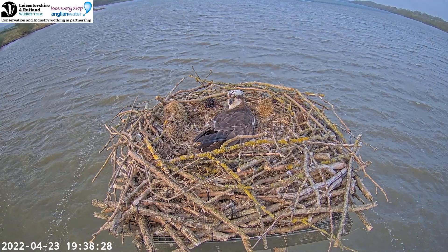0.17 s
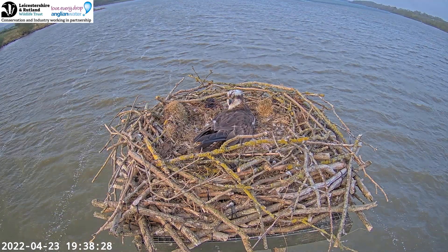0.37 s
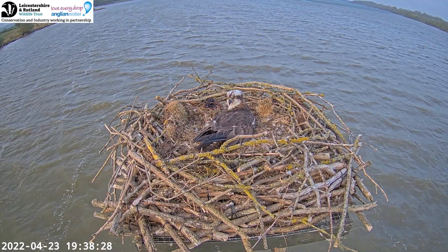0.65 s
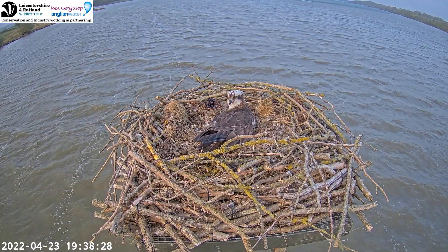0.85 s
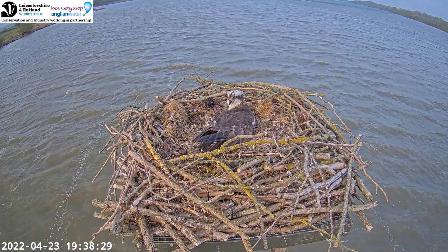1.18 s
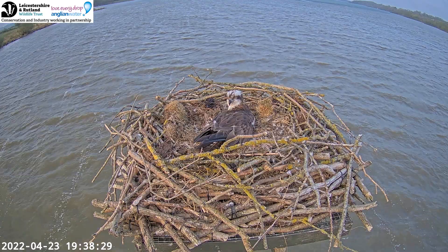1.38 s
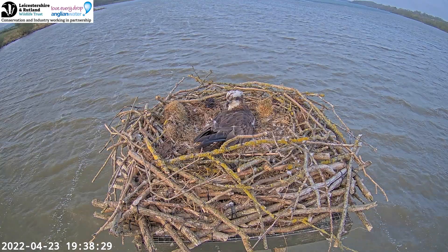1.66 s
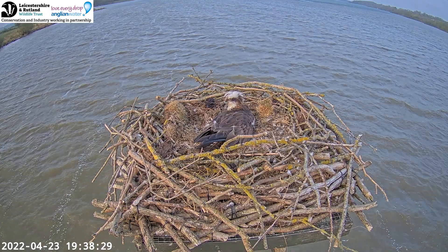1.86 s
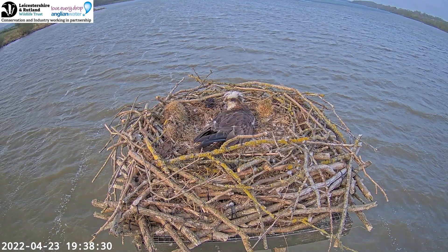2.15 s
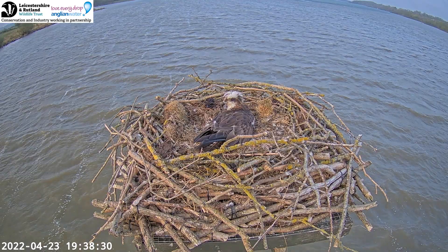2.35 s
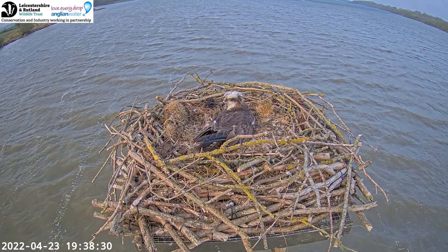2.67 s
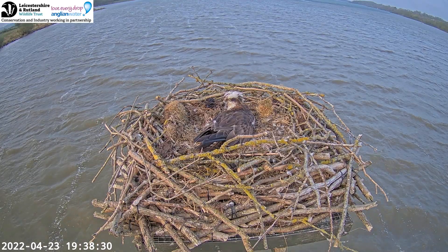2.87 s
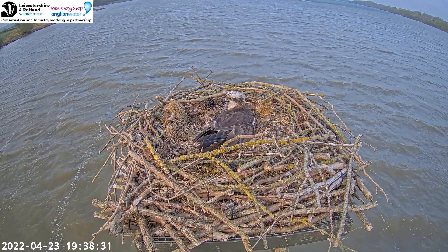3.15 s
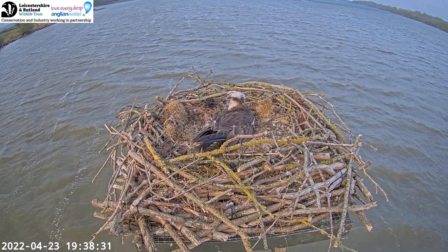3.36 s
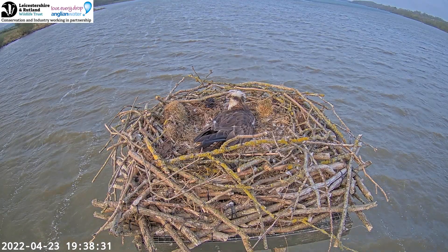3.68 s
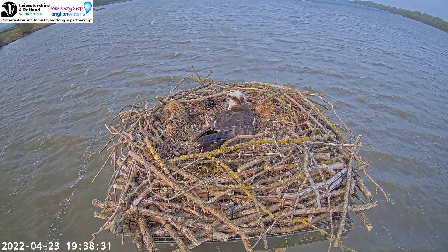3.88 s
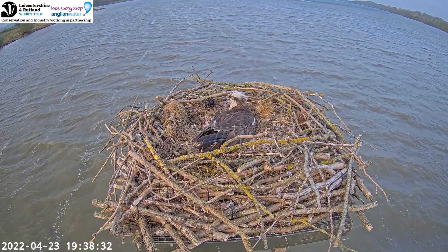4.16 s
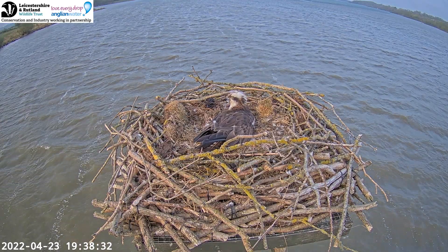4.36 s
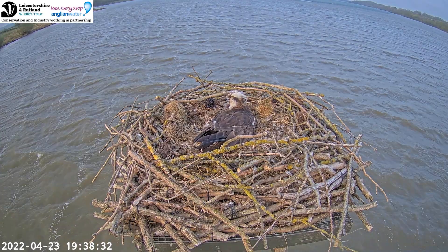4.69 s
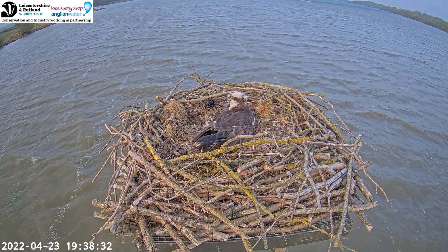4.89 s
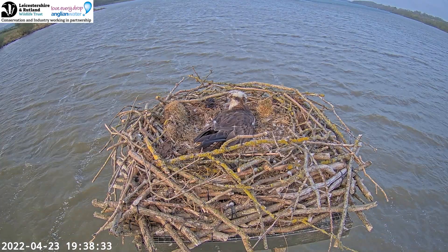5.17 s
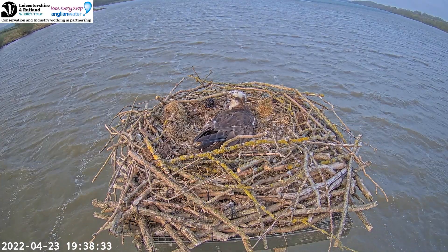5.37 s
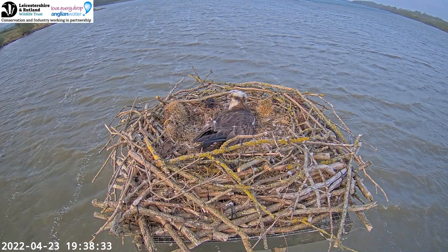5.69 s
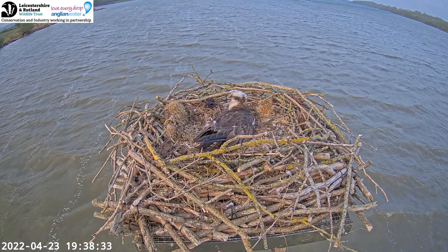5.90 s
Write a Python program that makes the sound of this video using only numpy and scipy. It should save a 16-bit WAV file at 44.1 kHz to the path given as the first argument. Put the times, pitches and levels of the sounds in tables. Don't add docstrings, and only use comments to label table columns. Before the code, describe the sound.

Close outdoor sound from an exposed microphone: deep gusty rumble, soft buffeting and a thin wash of waves. A bird of prey utters two sharp, raspy whistles at the start, pauses, then begins a regular series of brief high chirps, clearer at first and then rougher and strong, continuing until the end. A few faint twig clicks occur, mostly in the gap.

```python
import sys
import numpy as np
from scipy import signal
from scipy.fft import rfft, irfft
from scipy.io import wavfile
from scipy.ndimage import uniform_filter1d

SR = 44100
rng = np.random.default_rng(int(sys.argv[2]) if len(sys.argv) > 2 else 0)


def boost(x):
    u = np.asarray(x, float) / 20
    return 10 ** u


def bounce(signal):
    frames = np.transpose(np.atleast_2d(signal))
    limited = np.clip(frames, -1, 1)
    pcm = np.round(limited * 32767).astype(np.int16)
    wavfile.write(sys.argv[1], SR, pcm)


N = 266364


def at_hz(points, hz):
    point_hz, value = np.array(points).T
    return np.interp(np.log(hz), np.log(point_hz), value)


def in_time(rows):
    return np.interp(np.arange(N) / SR, *np.transpose(rows))


def rms_one(x):
    return x / np.sqrt(np.mean(x ** 2) + 1e-20)


def drift(rate_hz, size):
    r = np.exp(-2 * np.pi * rate_hz / SR)
    settle = 20000
    noise = rng.standard_normal(size + settle)
    return rms_one(signal.lfilter([1], [1, -2 * r, r * r], noise)[settle:])


def add(out, start_s, sound):
    i = round(start_s * SR)
    part = sound[max(-i, 0):N - i]
    out[max(i, 0):max(i, 0) + len(part)] += part


def fade_ends(size, attack_s, release_s):
    t = np.arange(size) / SR
    nearest_end = np.minimum(t / attack_s, t[::-1] / release_s)
    return np.sin(np.pi / 2 * np.clip(nearest_end, 0, 1)) ** 2


def ramp(x, start, end):
    return np.sin(np.pi / 2 * np.clip((x - start) / (end - start), 0, 1)) ** 2


def phase_of(hz):
    return 2 * np.pi * np.cumsum(hz) / SR


# time_s, level_db
GUSTS = [(0.0, -31), (0.34, -32), (0.37, -21.5), (0.45, -31.5), (1.18, -25), (1.28, -15.5), (1.5, -43),
         (1.58, -22), (1.73, -32), (1.95, -17.5), (2.02, -29), (3.85, -26), (4.19, -22), (4.37, -26.5),
         (4.81, -18.5), (4.88, -25.5), (5.74, -28), (6.04, -20)]
# time_s, level_db
BREEZE = [(0.05, -51), (0.25, -50), (0.69, -51.5), (4.71, -47.5), (4.79, -44.5), (6.0, -43.5)]
# pitch_hz, level_db (per Hz)
AIR_COLOUR = [(2.4, -51), (4.0, -11.5), (16, 5.5), (25, -5.5), (64, -16), (75, -21.5), (100, -24),
              (173, -33), (496, -43), (826, -43.5), (1170, -48.5), (1560, -49), (2610, -66), (5260, -77),
              (8220, -79.5), (10700, -122), (18100, -120)]
# pitch_hz, width_hz, boost_db
HOUSING = [(1574, 59, 3.5), (2307, 420, 4.5), (3230, 600, 6), (3830, 170, 4), (5250, 230, 9),
           (5400, 200, -2), (7980, 870, -13.5)]
RUMBLE_DB, RUMBLE_FOLLOWS, RUMBLE_LUMPS_DB = -28.5, 1.05, 3
BUFFET_DB, BUFFET_FOLLOWS, BUFFET_LUMPS_DB = -35.5, 0.39, 1.5
BUFFET_FRESHENS = 0.65
WASH_FOLLOWS = 0.19
EDDY_BUFFET_DB, EDDY_WASH_DB, EDDY_S = 4.5, 3, 0.015


def wind(rumble_share):
    t = np.arange(N) / SR
    gust_db = in_time(GUSTS)
    gust_db = gust_db - gust_db.mean()
    breeze_db = in_time(BREEZE)
    eddies = sum(abs(height) * np.exp(-((t - s) / EDDY_S) ** 2) for s, height, _ in EDDIES)

    hz = np.maximum(np.fft.rfftfreq(N, 1 / SR), 1)
    colour_db = at_hz(AIR_COLOUR, hz)
    for peak_hz, width_hz, boost_db in HOUSING:
        colour_db = colour_db + boost_db / (1 + (2 * (hz - peak_hz) / width_hz) ** 2)
    coloured = rfft(rng.standard_normal(N)) * boost(colour_db)

    groups = np.zeros((3, N))
    together = drift(3.7, N)
    for centre_hz in 3 * 2 ** np.arange(0, 12.5, .5):
        window = np.cos(np.pi * np.clip(np.log2(hz / centre_hz), -.5, .5)) ** 2
        flicker = boost(1.23 * together + 0.62 * drift(20.5, N))
        group = int(centre_hz > 40) + int(centre_hz > 200)
        groups[group] += flicker * irfft(coloured * window, N)

    power = uniform_filter1d(groups[:2] ** 2, size=5000, axis=1)
    groups[:2] /= np.sqrt(power + 1.4 * groups[:2].var(axis=1, keepdims=True))
    groups[0] *= rumble_share

    rumble_db = RUMBLE_DB + RUMBLE_FOLLOWS * gust_db + RUMBLE_LUMPS_DB * drift(10, N)
    buffet_db = BUFFET_DB + BUFFET_FOLLOWS * gust_db + BUFFET_LUMPS_DB * drift(9, N)
    buffet_db += BUFFET_FRESHENS * (breeze_db - breeze_db.mean()) + EDDY_BUFFET_DB * eddies
    wash_db = breeze_db + 1.0 + WASH_FOLLOWS * gust_db + EDDY_WASH_DB * eddies
    return sum(boost(db) * rms_one(g) for g, db in zip(groups, [rumble_db, buffet_db, wash_db]))


# time_s, height (sign is the push direction), width_ms
EDDIES = [(0.367, 0.23, 12), (1.291, 0.59, 21), (1.334, -0.2, 37), (1.949, 0.22, 17), (4.014, 0.42, 23),
          (4.132, -0.29, 16), (4.159, -0.45, 27), (4.185, 0.22, 13), (4.251, 0.25, 26), (4.732, -0.34, 34),
          (4.755, 0.066, 33), (4.786, 0.25, 8.3), (4.803, -0.27, 18), (6.025, -0.17, 10.4)]


def thumps():
    out, rumble_share, t = np.zeros(N), np.ones(N), np.arange(N) / SR
    for s, height, width_ms in EDDIES:
        out += 0.8 * height * np.exp(-np.log(2) * ((t - s) / (width_ms / 2000)) ** 2)
        rumble_share *= 1 - 0.97 * np.exp(-((t - s) / (width_ms / 500)) ** 2)
    return out - uniform_filter1d(out, size=5000), rumble_share


# start_s, level_db, pitch_hz
TICKS = [(0.439, -66, 6700), (0.824, -72.5, 6900), (0.871, -67.5, 6600), (1.961, -70.5, 8100),
         (2.123, -69.5, 6300), (2.868, -68, 7700)]


def twigs():
    out, t = np.zeros(N), np.arange(300) / SR
    for s, db, hz in TICKS:
        add(out, s, boost(db) * np.exp(-t / 0.0055) * np.sin(2 * np.pi * hz * t))
    return out


def glide(row, overtones_db, attack_s, release_s):
    _, length_s, start_hz, end_hz, db = row
    size = round(length_s * SR)
    turn = phase_of(np.linspace(start_hz, end_hz, size))
    tone = sum(boost(level_db) * np.sin((k + 1) * turn) for k, level_db in enumerate(overtones_db))
    return np.sqrt(2) * boost(db) * fade_ends(size, attack_s, release_s) * tone


# start_s, length_s, start_hz, end_hz, level_db
PIPS = [(4.397, .017, 1910, 2040, -42), (5.768, 0.019, 1904, 2016, -41.5)]
PIP_OVERTONES_DB = [7, -2, -21, -42]
# start_s, length_s, start_hz, end_hz, level_db
STRAYS = [(2.925, 0.03, 4200, 4750, -65.5), (2.95, 0.019, 3450, 3830, -67), (2.982, 0.026, 3950, 4100, -58),
          (3.01, .016, 4000, 3820, -62), (2.966, 0.044, 2950, 3200, -56.5), (2.994, 0.041, 5900, 5950, -56),
          (3.015, 0.032, 5350, 4800, -55.5), (3.17, 0.014, 5900, 6440, -62),
          (3.177, 0.027, 3610, 3950, -70)]


def voice_breaks(out):
    for pip in PIPS:
        add(out, pip[0], glide(pip, PIP_OVERTONES_DB, 0.0073, 0.002))
    for stray in STRAYS:
        add(out, stray[0], glide(stray, [0], .006, .006))


CLIMB_SHARE, CLIMB_PER_KHZ, CLIMB_POWER = .3, .55, 2.2
SINK_FROM, SINK_SPAN, SINK_POWER = 0.67, 0.36, 1.45
HOARSE_FROM, HOARSE_FULL, CLEAR_FROM, CLEAR_FULL = 0.024, 0.25, 0.67, .95
MIDDLE_DIP_DB, OPENING_SHARE, OPENING_SPAN = -6, 0.46, 0.2


def arch(share, leap_hz):
    climb = CLIMB_SHARE + CLIMB_PER_KHZ * leap_hz / 1000
    up = 1 - np.maximum(1 - share / climb, 0) ** CLIMB_POWER
    down = (np.maximum(share - SINK_FROM, 0) / SINK_SPAN) ** SINK_POWER
    clear = ramp(share, CLEAR_FROM, CLEAR_FULL)
    opening = OPENING_SHARE * np.maximum(1 - share / OPENING_SPAN, 0)
    full = opening + clear - 0.34 * ramp(share, CLEAR_FULL, 1)
    hoarse = ramp(share, HOARSE_FROM, HOARSE_FULL) * (1 - clear)
    return up, down, MIDDLE_DIP_DB * (1 - full), hoarse


PEAK_SHARE, FADE_FROM, FADE_SPAN = .4, .54, .17
SCOOP_SHARE, DROOP_SHARE = .05, .025
SWELL_DB, OVERTONE_ENTRY_DB, FADE_DB = -28, -5, -27


def rise(later):
    early = np.maximum(1 - later / PEAK_SHARE, 0)
    late = np.maximum(later - FADE_FROM, 0) / FADE_SPAN
    pitch = 1 - SCOOP_SHARE * early ** 1.1 - DROOP_SHARE * late ** 2
    fundamental_db = SWELL_DB * early ** 1.3 + FADE_DB * late ** 2
    overtones_db = OVERTONE_ENTRY_DB * np.exp(-later / .06) + FADE_DB * late ** 1.5
    return pitch, fundamental_db, overtones_db


# pitch_hz, level_db (per Hz)
RASP_COLOUR = [(940, -46.5), (1600, -39), (1910, -10.5), (2130, -20), (2670, -9.5), (2820, -18.5),
               (3840, -21.5), (5300, -31.5), (5530, -71.5), (5800, -27.5), (6120, -26.5), (6830, -29.5),
               (8220, -39), (10700, -61), (18100, -120)]
STEADY_SHARE = .7


def rasp_ladder(low, high, low_hz, beat_hz, flicker, chance):
    steps = np.arange(-3, 19)[:, None]
    ladder_db = at_hz(RASP_COLOUR, low_hz + steps * beat_hz / 2) + 5 - 7.0 * (steps % 2)
    unsteady = np.array([np.roll(flicker, 977 * j)[chance] for j in range(len(steps))])
    steady = STEADY_SHARE * (steps % 2 == 0)
    unsteady = steady + np.sqrt(1 - steady ** 2) * unsteady
    lines = boost(ladder_db) * unsteady * np.sin(low + steps * (high - low) / 2)
    return np.sum((steps != 0) * lines, axis=0)


# start_s, length_s, start_hz, top_hz, level_db
NOTES = [(-0.03, 0.11, 2426, 2773, -32.5), (0.221, 0.11, 2264, 2632, -32.5), (2.932, 0.12, 2150, 2650, -37),
         (3.168, 0.082, 2274, 2605, -33.5), (3.365, 0.087, 2263, 2670, -34.5),
         (3.568, 0.088, 2384, 2615, -33), (3.774, 0.088, 2427, 2632, -34.5), (3.98, 0.089, 2393, 2696, -35),
         (4.188, 0.091, 2450, 2780, -36), (4.414, 0.078, 2645, 2774, -35), (4.619, 0.095, 2460, 2764, -35),
         (4.834, 0.095, 2427, 2755, -34.5), (5.078, 0.1, 2336, 2730, -34.5), (5.332, 0.11, 2415, 2754, -34),
         (5.555, 0.1, 2380, 2826, -34.5), (5.786, 0.082, 2530, 2760, -34), (6.029, 0.054, 2300, 2694, -32)]
HIGHER_HZ = [3450, 3445, 3420, 3280, 3330, 3340, 3330, 3420, 3490, 3482, 3490, 3520, 3467, 3500, 3500, 3500]
# fundamental_db, octave_db, rasp_db
HIGHER_DB = [(-42, -56, -44), (-56, -62, -42.5), (-64, -75, -54.5), (-61, -64, -50), (-65, -62.5, -46.5),
             (-57, -59, -47.5), (-65.5, -61, -46.5), (-49.5, -57.5, -50), (-41.5, -56, -50.5),
             (-44, -57.5, -48.5), (-42.5, -63, -49.5), (-43, -62, -51.5), (-50, -60.5, -45),
             (-51, -66.5, -46.5), (-38.5, -59, -47), (-44.5, -61, -44.5)]
CLOSING_HZ = 2277
THROAT_LOW_HZ = 2300
ENTRY_SHARE = .15
SUM_TONE_DB, SUM_FOLLOWS = -58.5, 0.19
THROB_DEPTH, THROB_FULL_DB = .55, -45


def bird():
    out = np.zeros(N)
    hz = np.maximum(np.fft.rfftfreq(N, 1 / SR), 1)
    breath = rms_one(irfft(rfft(rng.standard_normal(N)) * boost(at_hz(RASP_COLOUR, hz)), N))
    flicker, throb = drift(35, N), drift(200, N)
    shake, wobble, flutter = drift(390, N), drift(330, N), drift(90, N)
    for k, (s, length_s, start_hz, top_hz, db) in enumerate(NOTES):
        size = round((length_s + 0.002) * SR)
        share = np.arange(size) / (length_s * SR)
        i = max(round(s * SR), 0) // 2
        chance = slice(i, i + size)

        up, down, dip_db, hoarse = arch(share, top_hz - start_hz)
        low_hz = start_hz + (top_hz - start_hz) * up + (CLOSING_HZ - top_hz) * down
        level = boost(db + dip_db) * fade_ends(size, 0.0024, 0.0068)
        level = level * boost(2.4 * np.exp(-share * length_s / 0.0034))
        level = level * boost(-.045 * np.maximum(THROAT_LOW_HZ - low_hz, 0))
        low = phase_of(low_hz + 28 * hoarse ** 2 * wobble[chance])
        overtones = boost(-32) * np.sin(2 * low) + boost(-47) * np.sin(3 * low)
        note = level * (1 - hoarse) * boost(4 * flutter[chance]) * overtones

        if k < len(HIGHER_HZ):
            first_db, octave_db, rasp_db = HIGHER_DB[k]
            pitch, swell_db, over_db = rise(share - ENTRY_SHARE)
            high_hz = HIGHER_HZ[k] * pitch
            high = phase_of(high_hz + 14 * shake[chance])
            sounding = boost(2 * flutter[chance]) * fade_ends(size, .004, .004)
            note += sounding * boost(first_db + swell_db) * np.sin(high)
            note += sounding * boost(octave_db + over_db) * np.sin(2 * high)

            sum_db = SUM_TONE_DB + SUM_FOLLOWS * (octave_db - SUM_TONE_DB)
            mixing = np.sin(low + high) + boost(-0.5) * np.sin(2 * low - high)
            mixing += boost(-16.5) * np.sin(2 * high - low)
            note += sounding * boost(sum_db + over_db) * mixing

            ladder = rasp_ladder(low, high, low_hz, high_hz - low_hz, flicker, chance)
            note += boost(rasp_db) * hoarse * (ladder + 0.53 * breath[chance])

            kept = 1 / (1 + (boost(first_db + swell_db) / boost(-47)) ** 2)
            note += 0.71 * level * (1 - kept) * shake[chance] * np.sin(.93 * low)
            depth = THROB_DEPTH * min(boost(rasp_db - THROB_FULL_DB), 1.25)
            level = level * kept * (1 + depth * hoarse ** 2 * throb[chance])
        note += level * np.sin(low)
        add(out, s, np.sqrt(2) * note)
    voice_breaks(out)
    return out


def scene():
    call = signal.filtfilt(*signal.iirnotch(5520, 8.0, fs=SR), bird())
    echo = np.zeros(N)
    add(echo, .009, boost(-22.5) * call)
    pushes, rumble_share = thumps()
    return (call + echo + wind(rumble_share) + pushes + twigs())[None]


def band_limit(x):
    return signal.sosfilt(signal.butter(12, 8370, fs=SR, output="sos"), x)


def record(dry):
    cut = signal.sosfiltfilt(signal.butter(4, 8600, fs=SR, output="sos"), dry)
    return band_limit(cut)


dry = scene()
out = record(dry)
bounce(out)
```